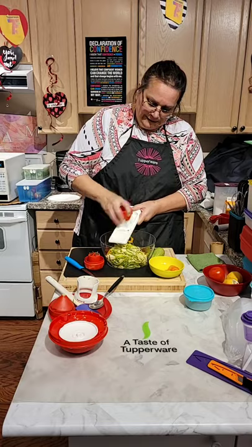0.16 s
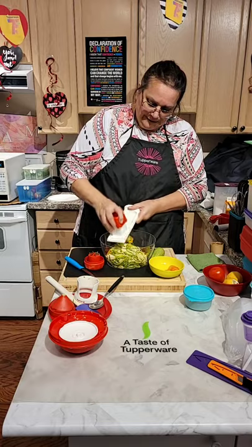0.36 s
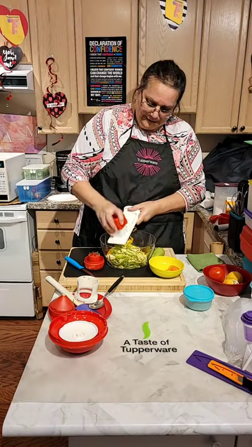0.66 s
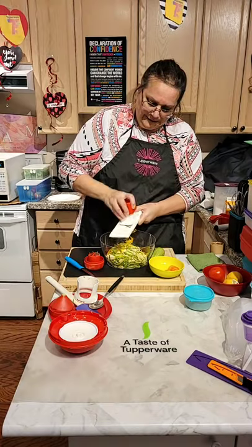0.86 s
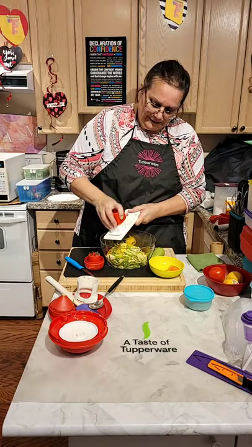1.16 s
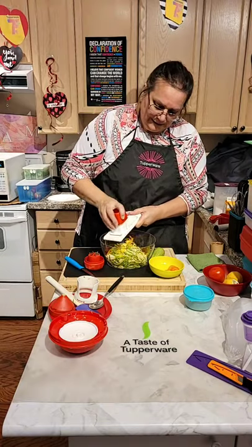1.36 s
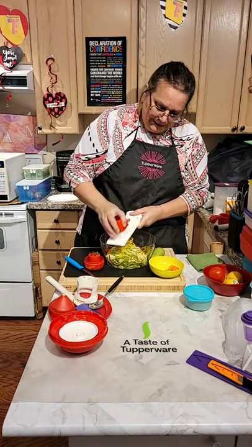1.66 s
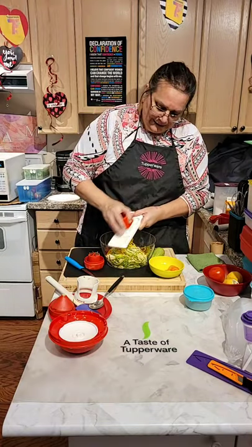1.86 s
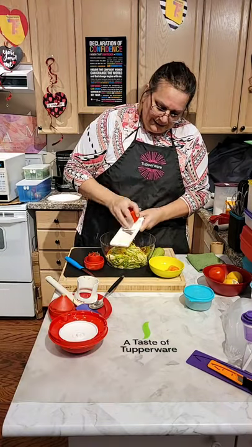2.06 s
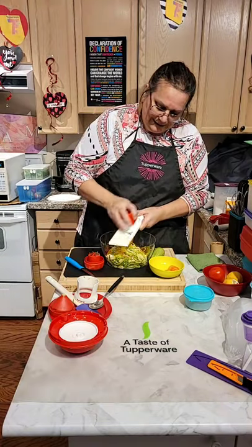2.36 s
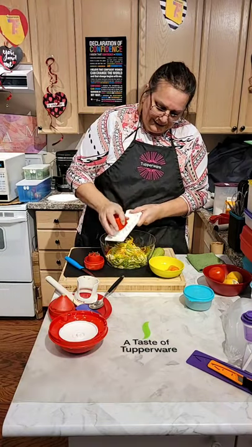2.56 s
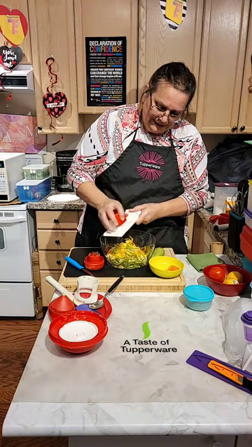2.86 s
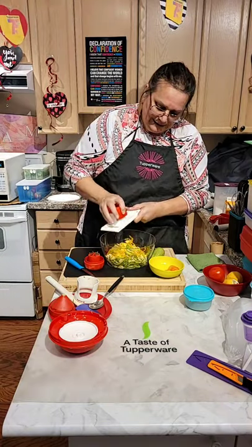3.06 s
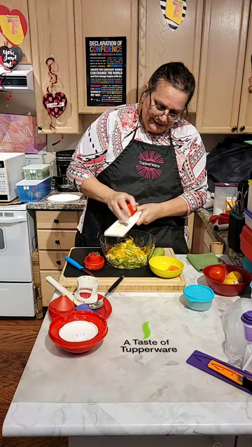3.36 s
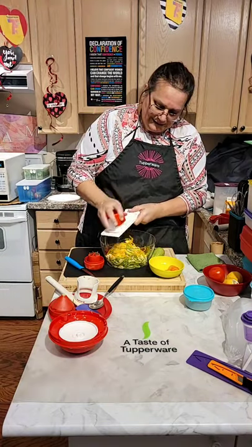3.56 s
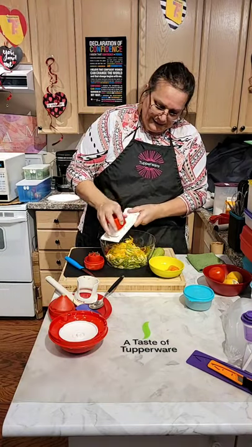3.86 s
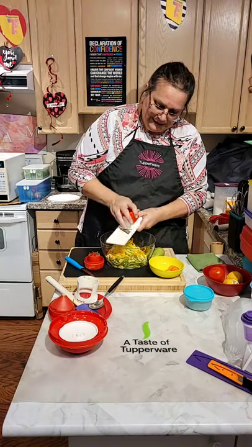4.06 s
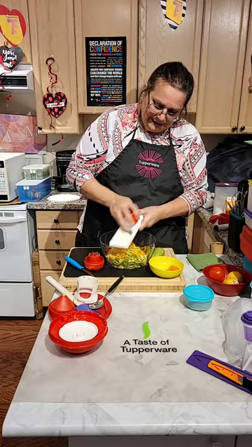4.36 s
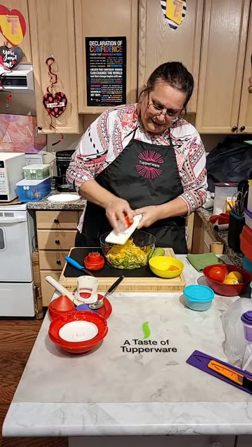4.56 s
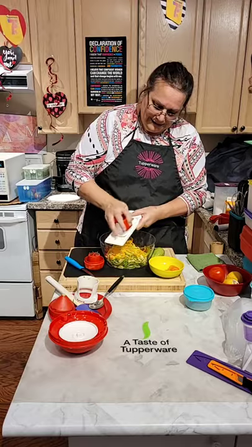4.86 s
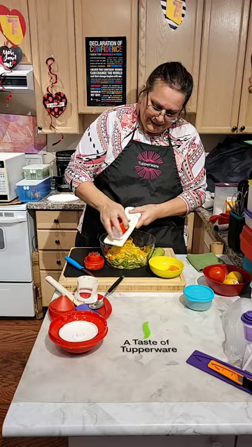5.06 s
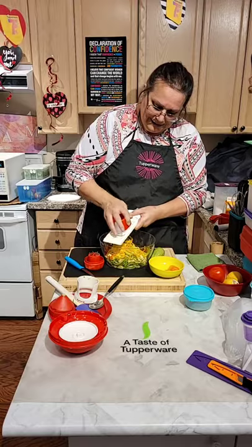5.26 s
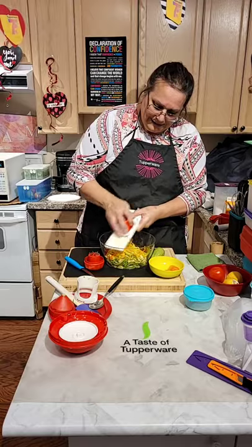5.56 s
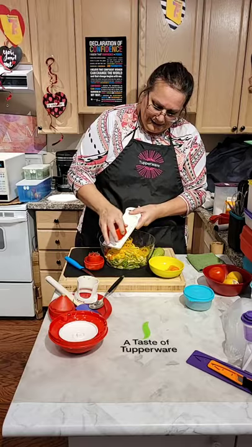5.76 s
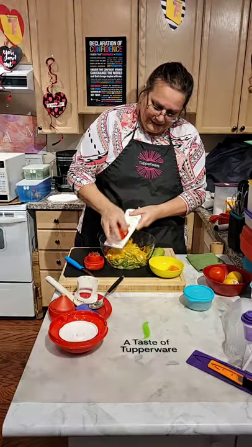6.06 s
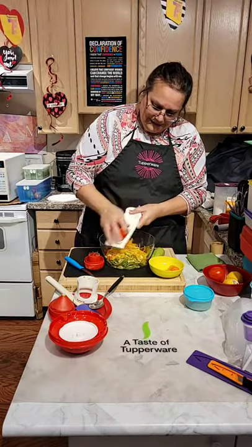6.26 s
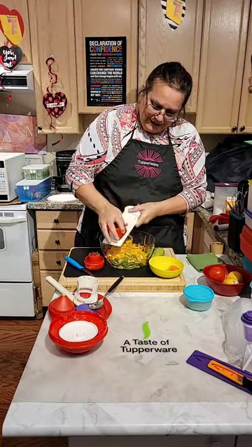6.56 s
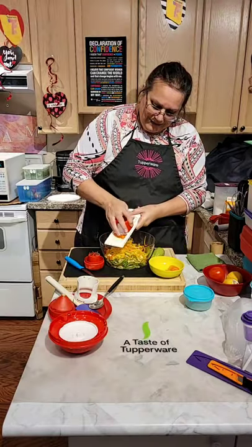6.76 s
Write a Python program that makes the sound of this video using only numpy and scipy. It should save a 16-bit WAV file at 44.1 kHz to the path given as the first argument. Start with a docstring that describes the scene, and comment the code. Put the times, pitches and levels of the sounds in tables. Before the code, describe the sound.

Close, uneven plastic clacks and crunchy scrapes of a mandoline slicing a pepper, over a faint appliance hum.

```python
"""A steady hush, an appliance hum and a faint rumble fill a small kitchen. Almost at once, close to
a pair of microphones, a pepper in a hand guard is pushed to and fro over a plastic mandoline.
The guard scrapes along the rails, the blade crunches through the flesh, and strokes end in hollow
clacks. Light taps and squeaks of skin fall in between; one stroke lands with a dull bump of the hand.
Counter and cupboards answer with a short echo."""
import sys
import numpy as np
from scipy import signal
from scipy.fft import rfft, irfft
from scipy.io import wavfile
from scipy.ndimage import uniform_filter1d

SR = 44100
rng = np.random.default_rng(int(sys.argv[2]) if len(sys.argv) > 2 else 0)


def waveform_to_disk(signal):
    """Save audio, clipped to [-1, 1], as 16-bit WAV at the path in sys.argv[1]."""
    frames = np.transpose(np.atleast_2d(signal))
    scaled = np.clip(frames, -1, 1) * 32767
    samples = np.round(scaled).astype(np.int16)
    wavfile.write(sys.argv[1], SR, samples)


N = 304710


def amp(db):
    return 10 ** (np.asarray(db) / 20)


def unit_rms(x):
    return x / np.sqrt(np.mean(x ** 2) + 1e-20)


def unit_blow(x, span_s=0.0058):
    """Scales a short sound to the energy of unit power lasting span_s."""
    return x / np.sqrt(np.mean(np.sum(x ** 2, -1)) / (span_s * SR))


def bell(x, centre, width):
    return np.exp(-((x - centre) / width) ** 2)


def curve_at(points, hz):
    """Joins points by straight lines over log frequency."""
    point_hz, value = np.transpose(points)
    return np.interp(np.log(hz + 1), np.log(point_hz + 1), value)


def add(mix, start_s, sound):
    part = mix[:, max(round(start_s * SR), 0):][:, :sound.shape[-1]]
    part += sound[..., :part.shape[-1]]


def drift(rate_hz):
    """A smooth random wander of unit rms."""
    hz = np.fft.rfftfreq(N, 1 / SR)
    return unit_rms(irfft(rfft(rng.standard_normal(N)) * bell(hz, 0, rate_hz), N))


# How alike direct sound is at the two microphones: (frequency [Hz], likeness [0-1])
MIC_LIKENESS = [(100, 0.9), (400, 0.66), (1300, 0.26), (4000, 0.45), (12000, 0.25)]

def mic_pair(spectra, hz):
    """Two unrelated spectra become what two closely spaced microphones hear."""
    likeness = np.clip(curve_at(MIC_LIKENESS, hz), 0, 1)
    mid = np.sqrt((1 + likeness) / 2) * spectra[0]
    side = np.sqrt((1 - likeness) / 2) * spectra[1]
    return np.array([mid + side, mid - side])


def coloured(noise, colour):
    """Filters two long noises and spreads them across the microphones, at unit rms."""
    hz = np.fft.rfftfreq(N, 1 / SR)
    return unit_rms(irfft(mic_pair(rfft(noise), hz) * amp(curve_at(colour, hz)), N))


# Room tone all around the microphones: (frequency [Hz], relative level [dB])
AIR_COLOUR = [(20, -27), (80, -18), (130, 1), (185, -7), (260, -4.5), (430, -7.5), (630, -12.5),
              (1200, -18.5), (2000, -23), (2800, -40), (7000, -35), (9400, -46), (15000, -49)]

def room_air(level_db=-53, wander_db=0.7):
    """The kitchen's air makes a dark, nearly steady hush."""
    level = amp(level_db + wander_db * drift(rate_hz=2.5))
    return level * coloured(rng.standard_normal((2, N)), AIR_COLOUR)


# An appliance in the background, a little to the left: (frequency [Hz], level [dB], wobble [0-1])
HUM_PARTIALS = [(48, -83, 0.5), (119.8, -69.5, 0.88), (141.4, -64.5, 0.72), (240.1, -52.5, 0.14),
                (274, -62.5, 0.1), (366, -72, 0.73)]

def appliance_hum():
    """A motor hums in low partials, each wavering in level and phase."""
    t = np.arange(N) / SR
    hum = np.zeros(N)
    for hz, db, wobble in HUM_PARTIALS:
        waver = 1 + wobble * (drift(rate_hz=1.74) + 1j * drift(rate_hz=2.4))
        tone = np.exp(2j * np.pi * (hz * t + rng.random()))
        hum += amp(db) * np.sqrt(2) * (waver * tone).real
    return hum * amp([[1.5], [-1.5]])


# Deep rumble, much alike at both microphones: (frequency [Hz], relative level [dB])
RUMBLE_SPECTRUM = [(15, -24), (28, -12), (42, 8), (60, 3.5), (90, -1.5), (160, -26), (500, -89)]
# Its swells: (time [s], level [dB])
SWELLS = [(0.05, -60), (0.36, -55), (1.39, -55), (1.94, -62), (2.3, -59), (4.27, -60.5), (5.75, -62)]

def rumble(level_db=-61, wander_db=0.5, swell_s=0.13):
    """A faint, uneven low noise that swells now and then."""
    t = np.arange(N) / SR
    floor = amp(level_db - wander_db * drift(rate_hz=1))
    swells = sum(amp(db) * bell(t, time, swell_s) for time, db in SWELLS)
    return (floor + swells) * coloured(rng.standard_normal((2, N)), RUMBLE_SPECTRUM)


def crunch(grains_per_s=380, spread_db=3.0, grain_s=0.0015, hiss=0.65):
    """Pepper cells burst in millisecond clumps over the even hiss of the rails."""
    sizes = amp(spread_db * np.minimum(rng.exponential(1, N), 4))
    bursts = sizes * (rng.random(N) < grains_per_s / SR)
    power = signal.lfilter([1], [1, -np.exp(-1 / (grain_s * SR))], bursts ** 2)
    return np.sqrt(hiss ** 2 + power / power.mean()) * rng.standard_normal((2, N))


# Pushes along the rails, close up: (time [s], length [s], level [dB], treble [dB])
GUARD_PUSHES = [(0.139, 0.12, -49, 7.5), (0.31, .10, -45, 11), (0.436, 0.11, -47, 5.5),
                (0.595, 0.077, -47.5, 6.5), (0.776, .07, -48.5, 6.5), (0.893, .08, -45.5, 4.5),
                (1.10, 0.37, -69, 2.5), (1.395, 0.11, -50, 8), (1.558, 0.13, -44, 3),
                (1.732, 0.16, -45.5, 10.5), (1.893, 0.096, -39, 14), (2.029, 0.094, -43, 9),
                (2.14, 0.16, -45.5, 10.5), (2.361, 0.084, -44.5, 7), (2.478, 0.073, -43.5, 4),
                (2.67, 0.065, -41, 4.5), (2.79, 0.11, -46.5, 5), (2.99, 0.24, -67.5, 12.5),
                (3.27, 0.13, -48, 7.5), (3.429, 0.11, -46, 4.5), (3.582, 0.055, -50.5, 5.5),
                (3.698, .15, -70, 10), (3.86, 0.044, -56, -1.5), (4.004, 0.085, -46, 8),
                (4.118, 0.13, -43.5, 2), (4.292, 0.15, -44.5, 10.5), (4.58, 0.062, -46.5, 5.5),
                (4.696, 0.12, -46.5, 4.5), (4.865, 0.033, -45.5, 4), (5.04, 0.027, -50.5, -7),
                (5.087, 0.054, -52.5, 6), (5.195, 0.038, -55, 6.5), (5.261, 0.021, -55, 13.5),
                (5.434, 0.096, -53, 6.5), (5.571, 0.11, -39.5, 5), (5.69, 0.11, -46.5, 5.5),
                (5.854, 0.058, -43.5, 8.5), (5.971, 0.11, -41.5, 8.5), (6.11, 0.071, -44.5, 6.5),
                (6.225, 0.066, -43, 4.5), (6.383, 0.078, -45, 6), (6.50, 0.12, -47.5, 8),
                (6.649, 0.047, -56, 17)]

def friction(t, grip_s=0.019, speed_up_db=1.5, release_s=0.019, rest_db=-74, rest_treble_db=8.5):
    """Level and treble of the rubbing: each push takes hold, grows with speed and dies away."""
    start, length, db, treble_db = np.transpose(GUARD_PUSHES)[:, :, None]
    age = np.maximum(t - start, 0)
    grip = 1 - np.exp(-age / grip_s)
    hold = amp(db + speed_up_db * (np.minimum(age / length, 1) - .5))
    release = np.exp(-np.maximum(age - length, 0) / release_s)
    power = (grip * hold * release) ** 2
    rustle = amp(rest_db) ** 2 * (t > start[0]) + 1e-14  # the pepper between pushes
    total = power.sum(0) + rustle
    return np.sqrt(total), ((power * treble_db).sum(0) + rustle * rest_treble_db) / total


# Rubbing on the plate, close up: (frequency [Hz], relative level [dB])
RUB_COLOUR = [(150, 0), (400, 9), (850, 10), (1200, 3), (1600, 9.5), (2300, 8.5), (3200, 4), (4200, 3),
              (5600, -1.5), (7500, -1), (8600, -8.5), (12500, -2), (15500, -9)]

def slide(judder_db=1.14, patchy_db=3.5, plate_db=4.0, plate_width_hz=380, treble_hz=4500):
    """The guard rubs over the plate, whose resonance moves with the stroke and the grip."""
    hz, frame_s, spectra = signal.stft(coloured(crunch(), RUB_COLOUR), SR, nperseg=512, noverlap=384)
    hz = hz[:, None]
    level, treble_db = friction(frame_s)
    stop_s, stop_plate_hz = np.array(GUARD_STOPS)[:, [0, 4]].T
    plate_hz = np.interp(frame_s, stop_s, np.clip(stop_plate_hz, 1500, 2000))
    resonance_db = plate_db * bell(hz, plate_hz, plate_width_hz)
    # the shifting contact favours now one mode, now another
    patches = uniform_filter1d(rng.standard_normal(spectra.shape[1:]), size=4, axis=0)
    patches = unit_rms(uniform_filter1d(patches, size=7, axis=1))
    high = 1 / (1 + (treble_hz / (hz + 1)) ** 4)
    spectra *= amp(resonance_db + high * treble_db + patchy_db * (1 - high) * patches)
    rub = signal.istft(spectra, SR, nperseg=512, noverlap=384)[1][:, :N]
    judder = amp(judder_db * drift(rate_hz=55))
    return rub * np.interp(np.arange(N) / SR, frame_s, level) * judder


# Struck plastic, close up: (frequency [Hz], relative level [dB])
CRACK_COLOUR = [(150, -34), (400, 1.5), (800, -2), (1050, -8.5), (1500, 0), (2500, 1), (3300, -2.5),
                (4300, -2), (5600, -7.5), (7400, -4), (8600, -13), (10500, -11), (12300, -6.5),
                (15500, -14.5)]

def crack(plate_db, plate_hz, rail_db, rail_hz, treble_db, treble_hz=8000, size=2048):
    """Dense, heavily damped modes of plate and rails die within milliseconds, the treble first."""
    rise_s, body_decay_s, snap_decay_s = 0.00022, 0.0025, 0.0018
    t, hz = np.arange(size) / SR, np.fft.rfftfreq(size, 1 / SR)
    noise = rng.standard_normal((2, size)) * (1 - np.exp(-t / rise_s))
    body = rfft(noise * np.exp(-t / body_decay_s))
    snap = rfft(noise * np.exp(-t / snap_decay_s))
    high = 1 / (1 + (treble_hz / (hz + 1)) ** 6)
    burst = mic_pair((1 - high) * body + high * snap, hz)
    burst /= np.sqrt(uniform_filter1d(abs(burst) ** 2, size=31))  # flatten before colouring
    plate = plate_db * bell(hz, plate_hz, width=0.14 * plate_hz)
    rail = rail_db * bell(hz, rail_hz, width=700)
    colour_db = curve_at(CRACK_COLOUR, hz) + plate + rail + treble_db * high
    # minimum phase: nothing rings before the blow
    log_gain = np.log(amp(np.r_[colour_db, colour_db[-2:0:-1]]))
    response = np.exp(np.conj(signal.hilbert(log_gain)))[:len(hz)]
    return unit_blow(irfft(burst * response))


def mode(hz, t60, spread_rad, rise_s=0.002, size=2048):
    """One damped mode swells quickly and reaches the two microphones slightly out of step."""
    t = np.arange(size) / SR
    phase = spread_rad * np.array([[.5], [-.5]]) * rng.choice([-1, 1])
    envelope = amp(-60 * t / t60) * (1 - np.exp(-t / rise_s))
    return unit_blow(np.sin(2 * np.pi * hz * t + phase) * envelope)


# Low modes of the hollow guard: (frequency [Hz], relative level [dB], t60 [s])
KNOCK_MODES = [(413, -3, 0.018), (516, -5.5, 0.016), (747, -9, 0.014)]

def guard_knock(scatter=0.13):
    """The hollow guard rings briefly, its pitches shifting with each grip."""
    return sum(amp(db) * mode(hz * (1 + scatter * rng.uniform(-1.2, 1)), t60, spread_rad=.26)
               for hz, db, t60 in KNOCK_MODES)


# The guard hits the end of its travel, close up: (time [s], level [dB], knock re crack [dB],
# plate resonance [dB], plate frequency [Hz], rail resonance [dB], rail frequency [Hz], treble [dB])
GUARD_STOPS = [(0.212, -15.5, -16.5, 10, 1500, 2.5, 5400, 0.5),
               (0.3726, -15.5, -16, 8.5, 1350, 6.5, 3480, -4.5),
               (0.6756, -19.5, -9.5, 9, 1330, 3.5, 3280, -2.5), (0.9697, -15.5, -16, 3, 2330, 4, 6150, -3),
               (1.64, -13.5, -14, 9, 1480, 4, 3900, 1), (1.9556, -18.5, -9.5, 8, 1110, 5, 3400, 2),
               (2.1045, -19, -8, 2.5, 1610, -1.5, 3400, 1.5), (2.269, -23, -26, 9, 2160, 3, 3140, -5),
               (2.436, -18.5, -15, 5, 1490, 2, 3460, 1), (2.5766, -16, -17.5, 5.5, 2510, 3, 6400, -4),
               (2.742, -15.5, -15, 9, 1430, 6.5, 3970, 3), (2.9198, -28, -25, 5, 1900, -1.5, 6130, -3),
               (3.359, -18, -8.5, 9.5, 1300, 7.5, 4250, 4.5),
               (3.5259, -19.5, -19.5, 10.5, 1280, -3, 7100, -1.5),
               (4.0828, -16, -9.5, 8, 1540, 7.5, 4760, 3), (4.2145, -15, -9, 7.5, 2180, 3.5, 4440, 0),
               (4.3549, -12, -35, 7, 1630, 8, 5060, 3), (4.6664, -19.5, -17.5, 13.5, 1720, 2.5, 5500, -0.5),
               (4.8002, -22, -6.5, 2.5, 2860, 6.5, 4300, -5), (5.137, -21, -14, 1, 2440, 5.5, 4530, -4),
               (5.4904, -23, -22.5, 8.5, 1380, 5.5, 4460, -4.5),
               (5.5818, -32.5, -15, 10, 1200, 1, 3500, -15), (5.637, -13.5, -14.5, 7, 1160, 12, 4750, -1),
               (5.7721, -15.5, -12, 6.5, 2200, 8.5, 4350, -2), (5.9225, -13.5, -28, 8, 1760, 10.5, 4880, 0),
               (6.051, -16, -10, 5, 1940, 7.5, 4300, -4), (6.206, -19.5, -33, 11, 1810, 6.5, 4970, -0.5),
               (6.3185, -15.5, -13, 7.5, 1920, 4.5, 4640, -2),
               (6.4861, -21, -17.5, 16.5, 1830, 7, 5200, 2.5),
               (6.5981, -12, -18.5, 11.5, 2070, 3, 3350, -5)]

def clacks(knock_lag_s=0.0006, room_knock_db=-2, room_resonance=0.82):
    """Each stop sounds a crack and a hollow knock; returns the direct sound and the room's feed."""
    direct, to_room = np.zeros((2, 2, N))
    for time, db, knock_db, plate_db, plate_hz, rail_db, rail_hz, treble_db in GUARD_STOPS:
        knock = amp(db + knock_db) * guard_knock()
        add(direct, time, amp(db) * crack(plate_db, plate_hz, rail_db, rail_hz, treble_db))
        add(direct, time + knock_lag_s, knock)
        # the room gathers sound from all sides of the slicer, so resonances stand out less
        diffuse = crack(room_resonance * plate_db, plate_hz, room_resonance * rail_db, rail_hz, treble_db)
        add(to_room, time, amp(db) * diffuse)
        add(to_room, time + knock_lag_s, amp(room_knock_db) * knock)
    return direct, to_room


# Soft thuds of pepper and guard, close up: (time [s], level [dB], frequency [Hz])
SOFT_THUDS = [(.315, -38, 422.7), (.612, -45.5, 637), (1.575, -51, 820), (1.785, -47, 786),
              (2.19, -41, 610), (2.672, -46.5, 624), (4.89, -64, 700), (5.58, -36.5, 774)]
# Light taps on the slicer: (time [s], level [dB])
LIGHT_TAPS = [(0.319, -37), (.363, -29.5), (.414, -54), (.613, -52), (.942, -36.5), (1.403, -49),
              (2.086, -47), (2.516, -38), (3.133, -47), (3.278, -61), (3.975, -51), (4.014, -52),
              (4.791, -35.5), (5.046, -53), (5.242, -47.5), (5.432, -44.5), (5.75, -37), (5.879, -40.5),
              (6.011, -37), (6.554, -33.5), (6.7, -37.5), (6.847, -50)]

def taps_and_thuds():
    """Small contacts ring the plastic lightly; soft ones only thud."""
    out = np.zeros((2, N))
    for time, db in LIGHT_TAPS:
        tap = crack(plate_db=7, plate_hz=1970, rail_db=-2.5, rail_hz=4270, treble_db=-12)
        add(out, time, amp(db) * tap)
    for time, db, hz in SOFT_THUDS:
        add(out, time, amp(db) * mode(hz, t60=0.017, spread_rad=.4))
    return out


# Pepper skin on plastic, centred: (time [s], length [s], level [dB], start pitch [Hz], end pitch [Hz])
SKIN_SQUEAKS = [(0.453, 0.021, -39.5, 3650, 3560), (0.496, 0.038, -48, 3870, 4220),
                (3.88, 0.046, -56.5, 2090, 2315), (4.742, 0.016, -38, 2250, 2220),
                (5.721, 0.044, -47, 4060, 3980)]

def squeaks(jitter=0.0084):
    """Skin sticks and slips quickly enough to make a brief, unsteady tone."""
    out, waver = np.zeros((2, N)), drift(rate_hz=350)
    for time, length, db, start_hz, end_hz in SKIN_SQUEAKS:
        n = round(length * SR)
        hz = np.linspace(start_hz, end_hz, n) * (1 + jitter * waver[round(time * SR):][:n])
        tone = np.sin(2 * np.pi * np.cumsum(hz) / SR)
        add(out, time, amp(db) * np.sqrt(2) * np.hanning(n) * tone)
    return out


# One bump, close and centred: (time [s], level [dB], frequency [Hz], swell [s])
BUMP_PARTIALS = [(1.950, -24, 95.5, 0.0043), (1.951, -26.5, 192, 0.0056)]

def hand_bump():
    """The hand lands at the end of a stroke: a dull, low push of a few cycles."""
    out = np.zeros((2, N))
    for time, db, hz, swell_s in BUMP_PARTIALS:
        t = np.arange(-4 * swell_s, 12 * swell_s, 1 / SR)
        add(out, time + t[0], amp(db) * np.sin(2 * np.pi * hz * t) / np.cosh(t / swell_s))
    return out


# Counter and cupboards near the microphones: (delay [s], relative level [dB])
EARLY_ECHOES = [(.0031, -7.5), (.0073, -9.5), (.0084, -7.5), (.0118, -19), (.0162, -9), (.018, -40)]
# Decay of the small kitchen: (frequency [Hz], t60 [s])
TAIL_T60 = [(150, 1), (500, 0.2362), (1700, 0.2726), (4500, 0.274), (12000, 0.2245)]
# Colour of its echo: (frequency [Hz], relative level [dB])
TAIL_COLOUR = [(150, -3), (450, -8), (800, -6), (950, 11.5), (1400, 3), (2000, 1.5), (4500, 4), (7000, 3.5),
               (9000, 4), (14000, 2)]

def kitchen_echo(sound, tail_db=-3.0, early_db=-3.0, build_s=0.0032, echoes_per_s=5000, size=20000):
    """Counter and cupboards reflect first; a short diffuse tail follows."""
    t = np.arange(size) / SR
    echoes = rng.choice([-1., 1.], (2, size)) * (rng.random((2, size)) < echoes_per_s / SR)
    hz, frame_s, spectra = signal.stft(echoes, SR, nperseg=256)
    hz = hz[:, None]
    spectra *= amp(curve_at(TAIL_COLOUR, hz) - 60 * frame_s / curve_at(TAIL_T60, hz))
    shared = 1 / (1 + (hz / 650) ** 2)  # long waves reach both microphones alike
    spectra[1] = shared * spectra[0] + np.sqrt(1 - shared ** 2) * spectra[1]
    response = signal.istft(spectra, SR, nperseg=256)[1][:, :size] * (1 - bell(t, 0, build_s))
    response *= amp(tail_db) / np.linalg.norm(response, axis=1, keepdims=True)
    for delay, db in EARLY_ECHOES:
        arrival = np.round((delay + rng.uniform(-.0003, .0003, 2)) * SR).astype(int)
        response[[0, 1], arrival] += amp(db + early_db)
    return signal.oaconvolve(sound, response, axes=1)[:, :N]


def shifting_echo(sound, patterns=9):
    """One echo pattern fades into the next as hands and slicer move."""
    place = np.linspace(0, patterns - 1, N)
    fades = (np.cos(np.pi / 2 * np.clip(place - k, -1, 1)) for k in range(patterns))
    return sum(kitchen_echo(sound * fade) for fade in fades)


def scene():
    """The slicer close to the microphones, with the kitchen's echo and room tone behind it."""
    direct_clacks, room_clacks = clacks()
    slicing = slide() + taps_and_thuds() + squeaks()
    bump = hand_bump()
    echo = shifting_echo(room_clacks + slicing + amp(-9.5) * bump)
    return direct_clacks + slicing + bump + echo + room_air() + appliance_hum() + rumble()


def record(dry, ceiling=0.92, cutoff_hz=15700):
    """The sharpest peaks are rounded off just under full scale, then the top treble is cut."""
    rounded = dry / (1 + (dry / ceiling) ** 8) ** (1 / 8)
    lowpass = signal.firwin(301, cutoff_hz, window=("kaiser", 8), fs=SR)
    return signal.oaconvolve(rounded, lowpass[None], "same")


dry = scene()
out = record(dry)
waveform_to_disk(out)
```